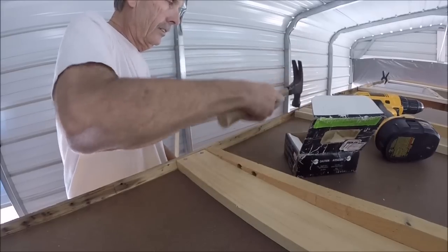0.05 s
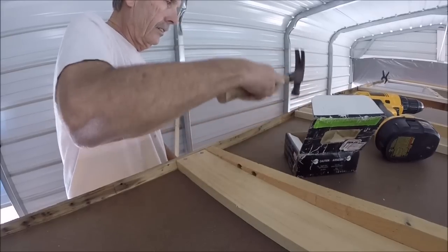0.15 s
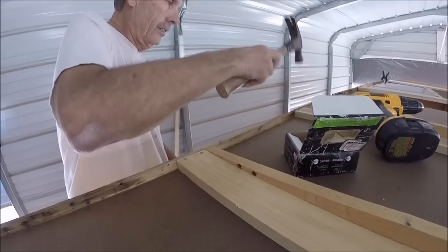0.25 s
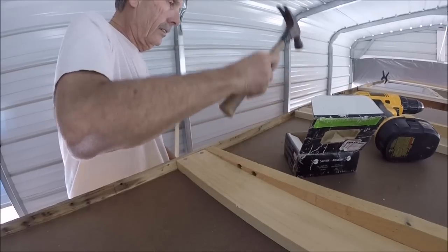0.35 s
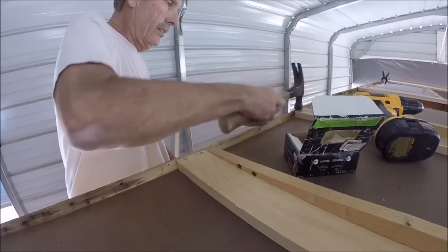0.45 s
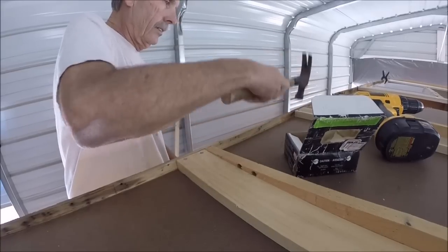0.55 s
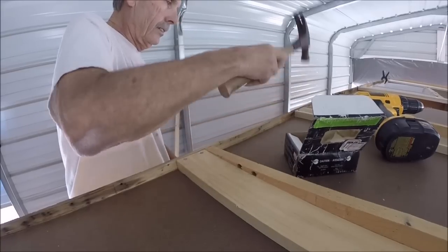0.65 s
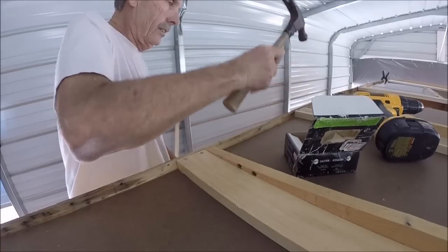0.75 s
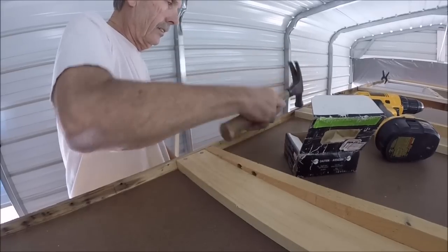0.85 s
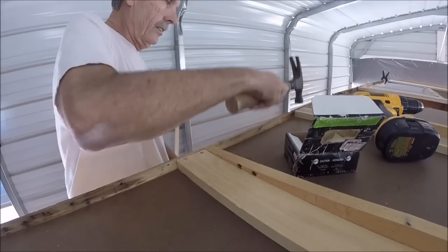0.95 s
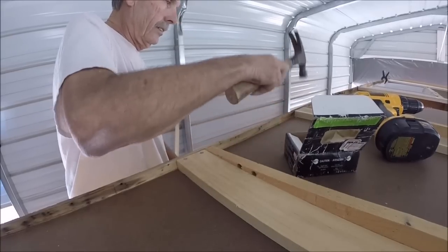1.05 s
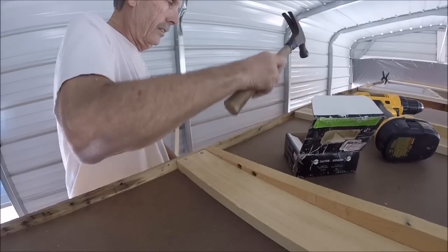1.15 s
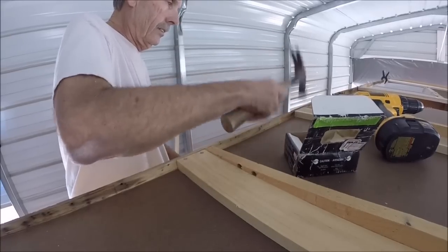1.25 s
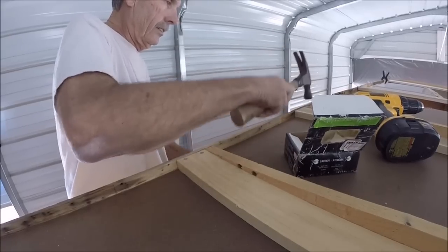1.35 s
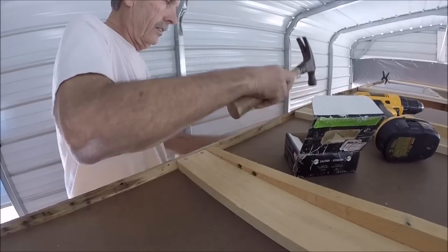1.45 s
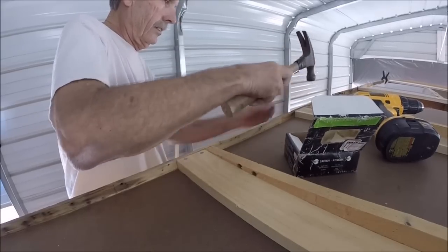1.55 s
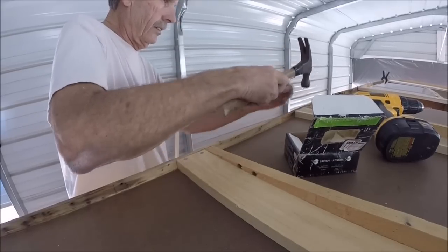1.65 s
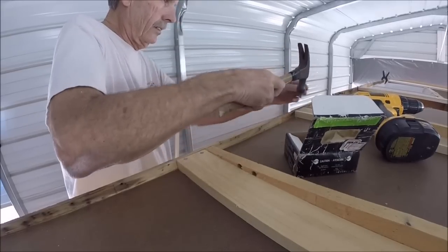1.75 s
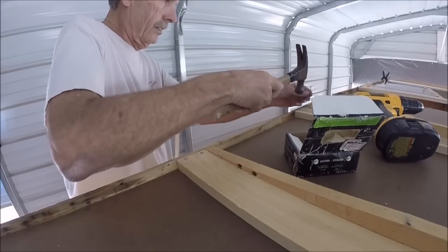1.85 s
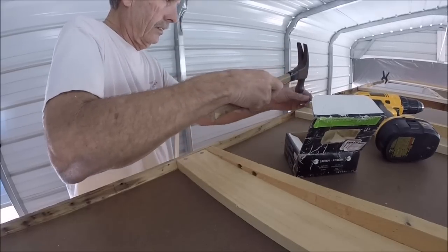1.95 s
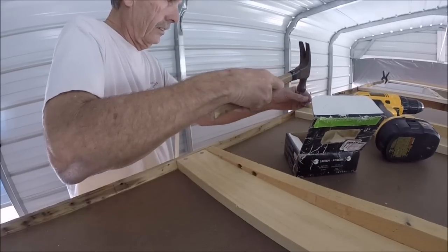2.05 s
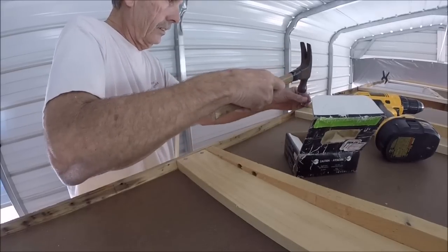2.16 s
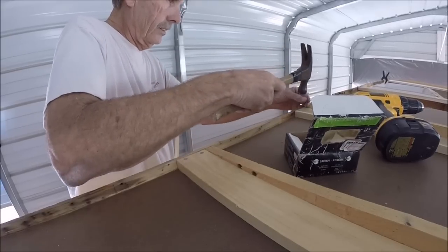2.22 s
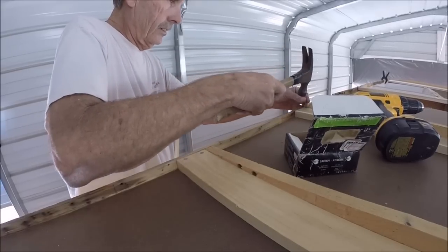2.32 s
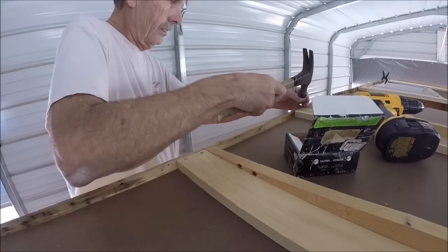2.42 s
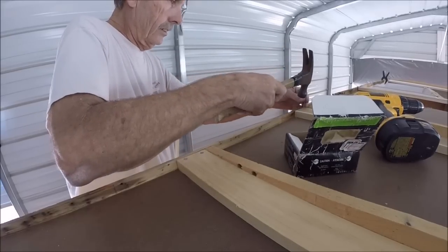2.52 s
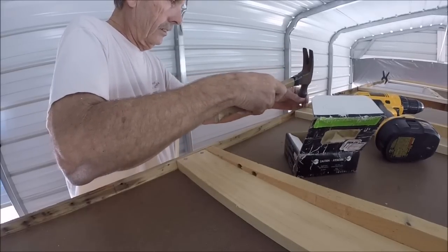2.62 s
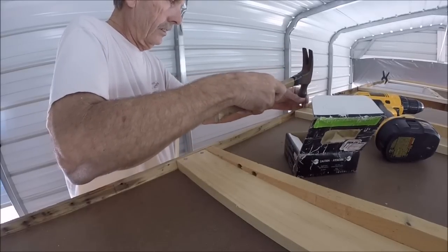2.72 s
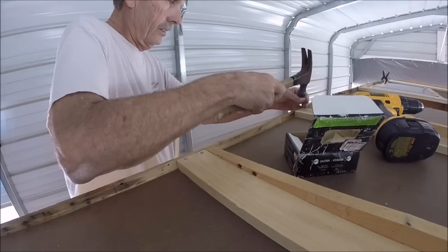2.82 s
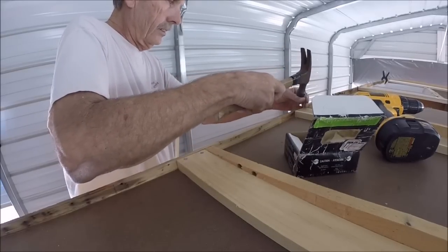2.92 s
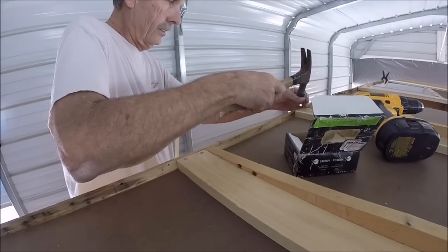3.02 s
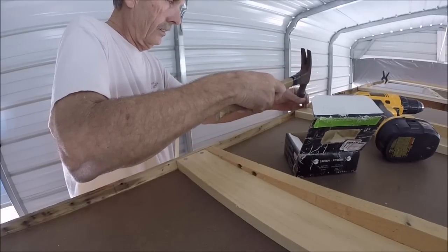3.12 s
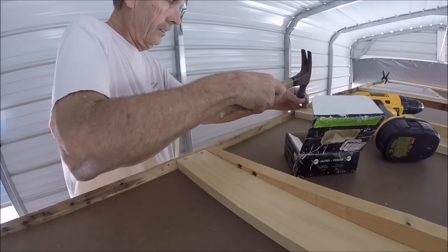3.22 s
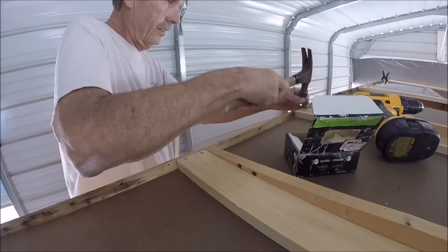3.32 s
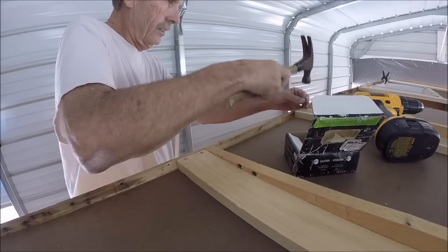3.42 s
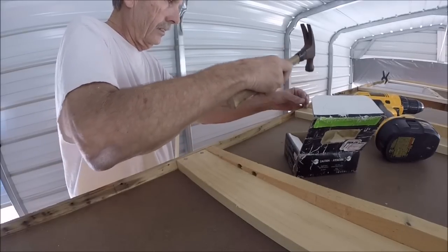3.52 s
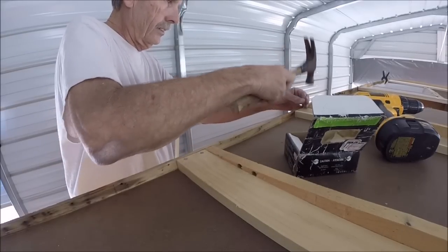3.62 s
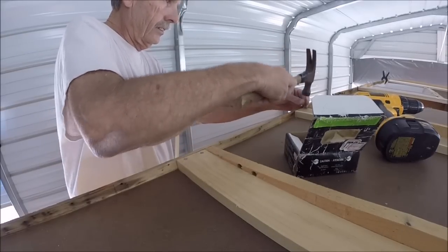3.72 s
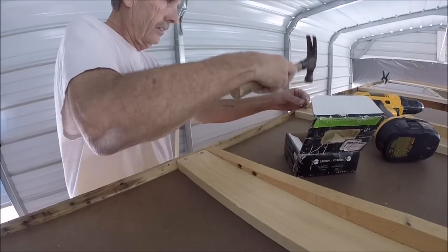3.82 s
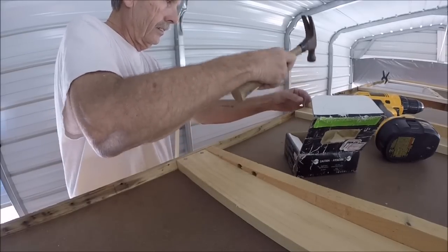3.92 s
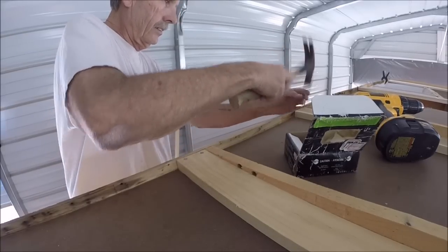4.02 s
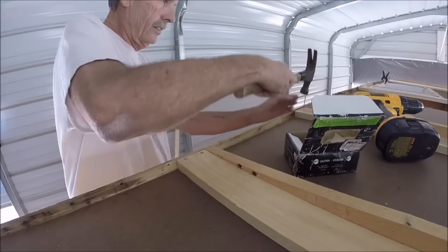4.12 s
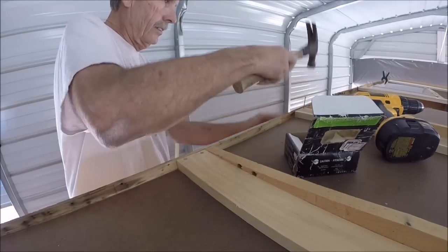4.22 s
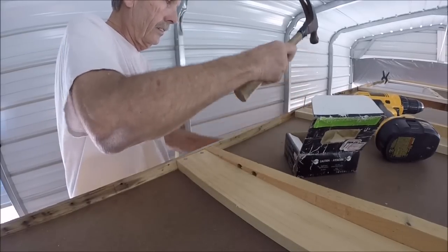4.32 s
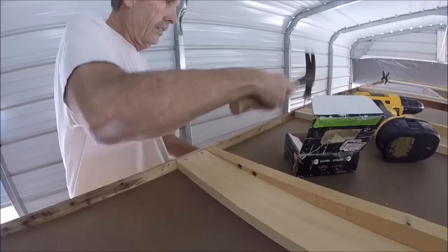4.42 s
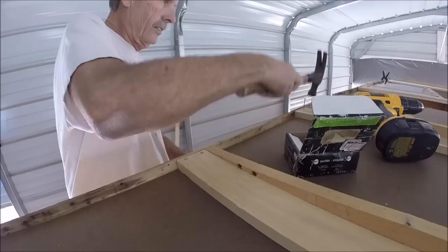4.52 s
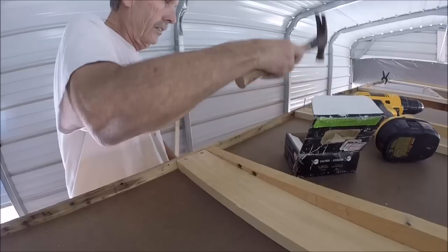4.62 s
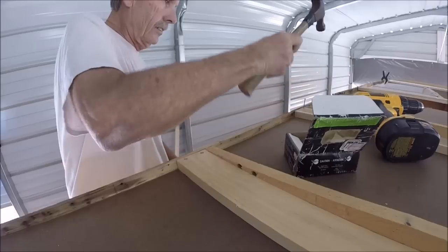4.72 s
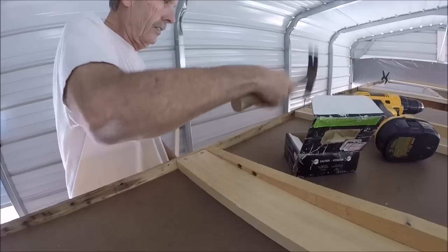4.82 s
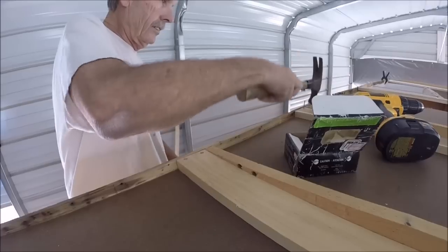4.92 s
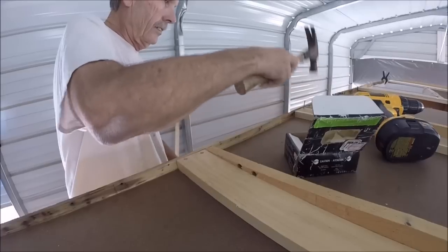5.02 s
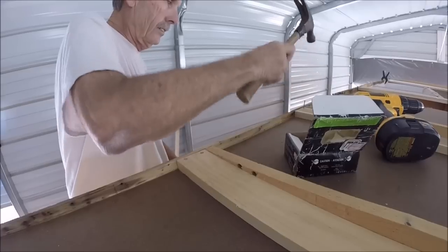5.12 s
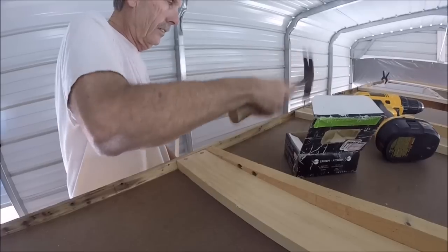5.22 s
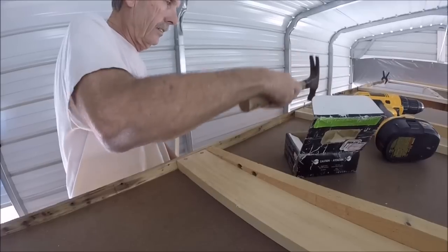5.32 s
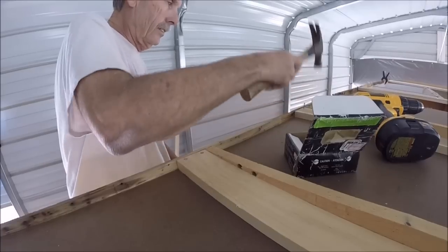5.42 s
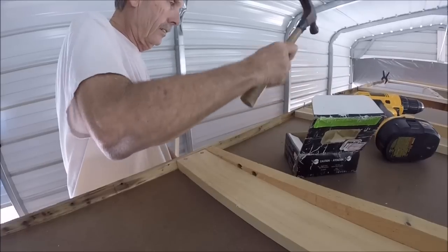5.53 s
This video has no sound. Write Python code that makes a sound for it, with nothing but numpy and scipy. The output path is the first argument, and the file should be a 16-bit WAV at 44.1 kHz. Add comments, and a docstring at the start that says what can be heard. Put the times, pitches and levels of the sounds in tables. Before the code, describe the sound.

Close by, under a sheet-metal carport, four hard hammer blows sink a nail into wood, the last two with a lower knock. After about two seconds of faint hiss comes a gentle tap with a hollow wooden bump. Four more evenly spaced strikes drive a second nail, its metallic ring rising in pitch, while the bench and wall panels resonate briefly.

```python
"""Under a sheet-metal carport, a claw hammer drives nails into a wooden strip on a bench.
Four blows sink one nail; after a pause a tap sets the next, whose ring climbs as it gets shorter.
Each blow is a steel crack, a nail ping and a wooden thud; bench and wall panels ring on, and twice
the loose frame hops and drops back. The camera's gain control ducks on the hard blows and lets the
background hiss swell in the pause."""
import sys
import numpy as np
from scipy import signal
from scipy.fft import rfft, irfft
from scipy.io import wavfile
from scipy.ndimage import uniform_filter1d, minimum_filter1d

SR = 44100
rng = np.random.default_rng(int(sys.argv[2]) if len(sys.argv) > 2 else 0)


def wav_out(sig):
    """Save sig, one row per channel (or a flat mono array), as 16-bit PCM at SR to the path in sys.argv[1]."""
    wavfile.write(sys.argv[1], SR, np.round(np.clip(np.atleast_2d(sig).T, -1, 1) * 32767).astype(np.int16))


N = 245616
AGE = np.arange(SR) / SR  # s since a blow
BINS = np.fft.rfftfreq(SR, 1 / SR)  # Hz
FLUSH_FROM_S, SECOND_NAIL_FROM_S = 1.2, 2.5

# the carport's reverb: (frequency [Hz], level [dB], t60 [s])
CARPORT_REVERB = [(50, 7.5, 0.7), (79, 4.5, 1), (115.6, 2, .5), (199, 6.5, .48), (275, 6, 0.45),
                  (612, 4.5, 0.39), (1500, -2.5, 0.39), (3530, 0.5, 0.36), (5930, -4.5, 0.35),
                  (8600, -0.5, 0.27), (15000, -5.5, 0.23)]


def amp(db):
    """Decibels to gain."""
    return 10 ** (np.asarray(db) / 20)


def curve(points, hz, column=1):
    """One column of a table, joined by straight lines over log frequency."""
    columns = np.transpose(points)
    return np.interp(np.log(hz + 1), np.log(columns[0] + 1), columns[column])


def add(mix, s, sound):
    """Lays a sound into the mix at s seconds."""
    part = mix[max(round(s * SR), 0):][:len(sound)]
    part += sound[:len(part)]


def pulse(db):
    """Spectrum of the tightest causal pulse with these levels."""
    log_gain = np.log(amp(np.r_[db, db[-2:0:-1]]))
    return np.exp(np.conj(signal.hilbert(log_gain)))[:len(db)]


def whitened(x, band_hz):
    """Spectrum of x with its power evened to 1 over bands of this width."""
    spectrum = rfft(x)
    power = uniform_filter1d(abs(spectrum) ** 2, band_hz)
    return spectrum * pulse(-10 * np.log10(power + 1e-12))


def ring(modes):
    """Dying sines from rows of (frequency [Hz], resonance peak [dB], t60 [s])."""
    out = np.zeros(SR)
    for hz, db, t60 in modes:
        damping, t = np.log(1000) / t60, AGE[AGE < 2 * t60]
        envelope = amp(db) * 2 * damping / SR * np.exp(-damping * t)
        add(out, 0, envelope * np.sin(2 * np.pi * hz * t))
    return out


def background_hiss(level_db=-47):
    """A steady bed of hiss with some low rumble."""
    # tone of the bed: (frequency [Hz], relative level [dB])
    colour = [(15, -53.5), (25, 1.5), (55, -0.5), (97, -3.5), (123, -2.5), (263, 0), (317, -5.5),
              (624, -10.5), (911, -7), (3340, -14), (4610, -24), (5730, -22), (7920, -40.5), (14400, -52),
              (16000, -66)]
    hz = np.fft.rfftfreq(N, 1 / SR)
    noise = irfft(rfft(rng.standard_normal(N)) * amp(curve(colour, hz)), N)
    return amp(level_db) * noise / noise.std()


def crack(tilt_db_per_octave, pivot_hz=1500):
    """Spectrum of the contact: a square blow on a free nail is brightest."""
    # steel meeting the nail head: (frequency [Hz], level [dB])
    colour = [(30, -20.5), (120, -1), (300, -5.5), (450, -6.5), (700, -1.5), (1150, 0.5), (1550, 4.5),
              (2250, -1.5), (3300, 3), (4500, -4), (6000, -4), (7300, -8), (9000, -19.5), (12000, -15.5),
              (16000, -43)]
    octaves_above = np.log2(np.maximum(BINS / pivot_hz, 1))
    return pulse(curve(colour, BINS) + tilt_db_per_octave * octaves_above)


def slips(t60=0.014):
    """Spectrum of the nail jerking through the fibres, which smears the crack over a few milliseconds."""
    return whitened(rng.standard_normal(SR) * amp(-60 * AGE / t60), band_hz=400)


def hammer_ring():
    """Spectrum of the steel hammer head's short, bright ring."""
    # modes of the head: (frequency [Hz], peak [dB], t60 [s])
    head_modes = [(5350, 2.5, 0.0052), (5410, 0.5, 0.01)]
    return rfft(ring(head_modes))


def nail_ping(hz, cycles, free_cycles=166, top_hz=12500):
    """Spectrum of the bending shank: wood that damps it also pulls its modes apart into a broad clang."""
    # close modes, faint overtones: (pitch [ratio], detune at free_cycles [share], peak [dB], t60 [ratio])
    shank_modes = [(1, -.07, -11, .3), (1, -.031, 4, 1), (1, -.003, 2, 1.1), (1, .032, 3, 1),
                   (1, .07, -7, .4), (2.09, 0, -21, .8), (3.1, 0, -24, .8), (3.9, 0, -18, .3)]
    t60 = cycles / hz
    spread = (free_cycles / cycles) ** 0.48
    modes = [(hz * ratio * (1 + detune * spread), db, t60 * life)
             for ratio, detune, db, life in shank_modes]
    # the modes start a quarter cycle apart; none above top_hz is rung
    return sum(rfft(ring([mode])) * 1j ** k for k, mode in enumerate(modes) if mode[0] < top_hz)


def thud(hz, t60=0.0082, db=6, low_cut_hz=200):
    """Spectrum of wood being shoved down and springing back."""
    push = rfft(ring([(hz, db, t60)]))
    low_cut = signal.butter(2, low_cut_hz, "high", fs=SR)
    return push * signal.freqz(*low_cut, worN=BINS, fs=SR)[1]


def strip_thud(s, nail_hz, loose_hz=330, pinned_hz=450):
    """The lower a nail knocks, the harder it shoves the strip; driven flush, it pins the thud higher."""
    flush = FLUSH_FROM_S < s < SECOND_NAIL_FROM_S
    handed_on_db = 5.5 - 9 * np.log2(nail_hz / 1000)
    return amp(handed_on_db) * thud(pinned_hz if flush else loose_hz)


def bench_ring(s, rise_s=0.012):
    """The large top takes a moment to start swinging; where it is struck decides which modes speak."""
    # strip and top: (frequency [Hz], peak at first nail [dB], peak at second nail [dB], uncapped t60 [s])
    wood_modes = [(51.15, 17, 19, 0.99), (79.1, 20, 22, 0.41), (165.7, 11, 14, 0.94),
                  (242.8, 22.5, 18, 0.24), (267.3, 14.5, 15.5, 0.45), (288.4, 22, 23, 0.32),
                  (310.6, -1.5, 21.5, 0.07), (331.7, 11.5, 14, 0.16), (352.5, 20.5, 18.5, .28),
                  (382, 11, 9.5, 0.74), (487.2, 13.5, 14.5, 0.18), (506, 8, 9, 0.39), (542, 18, 12, 0.22),
                  (603, 14, 3.5, 0.18), (666, 15, 16, 0.092), (713, 17.5, 2, 0.53), (763, 20, 11, 0.18),
                  (904, 12, 3, 0.48), (956, 13.5, -6, 0.11), (1029, 18.5, 8, 0.9), (1085, 5.5, 7.5, 0.75),
                  (1315, 8, -2.5, 0.77), (1328, 9.5, 5.5, 0.9), (1555, 3, -9, 0.31), (1628, 15, -21, 0.48),
                  (1570, 1, -2.5, 0.67)]
    hz, first_db, second_db, t60 = np.transpose(wood_modes)
    t60 = np.minimum(t60, 0.27 + 30 / hz)  # wood soaks up its higher modes quickly
    peak_db = second_db if s > SECOND_NAIL_FROM_S else first_db
    return ring(zip(hz, peak_db, t60)) * (1 - np.exp(-AGE / rise_s))


def tail(bands, rise_s):
    """Spectrum of dense reflections that build up, then die at their own speed in each band."""
    hz, t, noise = signal.stft(rng.standard_normal(SR), SR, nperseg=512)
    decay = amp(-60 * t / curve(bands, hz, column=2)[:, None])
    dying = signal.istft(noise * decay, SR, nperseg=512)[1][:SR]
    build_up = 1 - np.exp(-(AGE / rise_s) ** 2)
    return whitened(dying * build_up, band_hz=120) * amp(curve(bands, BINS))


def panel_drumming(contact):
    """Spectrum of the sheet-metal walls drumming on faintly after the crack."""
    # ring of the panels: (frequency [Hz], level [dB], t60 [s])
    panel_bands = [(45, -4, 1.1), (75, 11.5, 2.4), (115.7, -17.5, 4.2), (260, -16.5, 4.8), (800, -52, 1.2),
                   (3000, -53.5, .8)]
    return contact * tail(panel_bands, rise_s=0.04)


def hammering(nail_direct_db=-4, thud_to_room_db=-12, head_to_room_db=-7, full_swing_db=22):
    """Each blow sounds nail, hammer and wood; the carport throws it back."""
    # a free nail pings higher as it shortens; one that is nearly home only knocks, low and damped
    # (time [s], force [dB], brightness [dB/octave], bench ring [dB], hammer ring [dB],
    #  nail pitch [Hz], nail ring [dB], nail t60 [cycles])
    blows = [ (0.1208, 22, -0.3, 2.5, -3.5, 1033, 4, 18), (0.5410, 24.5, -2.5, -2, -8.5, 1455, -6.5, 46),
             (0.9587, 24, -4, -3, -3, 690, 8, 21), (1.3916, 24, -3, -7.5, -11, 714, 4, 25),
             (3.7716, -1.5, 0.1, 17, 9, 565, 6, 20), (4.1547, 16.5, -0.5, 4, -4, 2820, 5, 104),
             (4.5406, 22, -1.5, -1, -2.5, 3704, 14.5, 190), (4.9456, 23, -0.9, -6.5, -1.5, 4630, 10, 42),
             (5.3452, 23.5, 0, -3.5, -1.5, 6450, 1, 86)]
    # early reflections off bench and worker: (delay [s], level [dB])
    reflections = [(.0024, -35), (.0074, -9.5)]
    echoes = sum(amp(db) * np.exp(-2j * np.pi * BINS * s) for s, db in reflections)
    fade = np.minimum(2 - 2 * AGE, 1) ** 2
    mix = np.zeros(N)
    for s, force_db, tilt, bench_db, head_db, nail_hz, nail_db, cycles in blows:
        contact = crack(tilt)
        head = amp(head_db) * hammer_ring()
        nail = amp(nail_db) * nail_ping(nail_hz, cycles)
        strip = strip_thud(s, nail_hz)
        direct = (contact * slips() + head + amp(nail_direct_db) * nail) * (1 + echoes) + strip
        # the camera sits on the bench, so it hears the thud mostly direct
        sends = [contact, nail, amp(head_to_room_db) * head + amp(thud_to_room_db) * strip]
        wet_db = 2.4 + 0.19 * (full_swing_db - force_db)  # a harder swing sounds drier
        room = amp(wet_db) * sum(send * tail(CARPORT_REVERB, rise_s=0.0011) for send in sends)
        blow = irfft(direct + room + panel_drumming(contact)) + amp(bench_db) * bench_ring(s)
        add(mix, s, amp(force_db) * fade * blow)
    return mix


def frame_drops(thud_hz=285, room_db=-6):
    """The loose frame hops under a blow and lands on the bench: a dull, hollow knock of wood on wood."""
    # landings: (time [s], force [dB], thud [dB], bench ring [dB])
    landings = [(1.008, 13, 13, -14), (3.8205, -4.5, 16.5, 8)]
    mix = np.zeros(N)
    for s, force_db, thud_db, bench_db in landings:
        knock = crack(tilt_db_per_octave=-2) * slips() + amp(thud_db) * thud(thud_hz, t60=0.02)
        room = amp(room_db) * tail(CARPORT_REVERB, rise_s=0.0046)
        airborne = irfft(knock * (1 + room))
        add(mix, s, amp(force_db) * (airborne + amp(bench_db) * bench_ring(s)))
    return mix


def scene():
    """Hammer blows and frame knocks over the hiss, in mono."""
    return (hammering() + background_hiss() + frame_drops())[None]


def ducking(x, threshold_db=-19, slope=0.79, hold_s=0.44, release_db_per_s=21, low_cut_hz=600):
    """Gain reduction in dB: clamps at once on a sharp, loud sound, holds, then lets go steadily."""
    sidechain = signal.lfilter(*signal.butter(2, low_cut_hz, "high", fs=SR), x)
    power_db = 10 * np.log10(abs(uniform_filter1d(sidechain ** 2, size=180)) + 1e-12)
    cut_db = slope * np.maximum(power_db - threshold_db, 0)
    cut_db[0] = 12.5  # starts ducked: the work is already under way
    half_hold = int(hold_s * SR / 2)
    held_db = -minimum_filter1d(-cut_db, 2 * half_hold + 1, origin=half_hold, mode="nearest")
    climb_db = release_db_per_s * np.arange(N) / SR
    released_db = np.maximum.accumulate(held_db + climb_db) - climb_db
    return uniform_filter1d(released_db, size=40)


def record(dry, ceiling=0.5, high_cut_hz=15200):
    """The camera's gain control, soft overload on the peaks, then a steep high cut."""
    ducked = dry / amp(ducking(dry[0]))
    limited = ducked / (1 + (ducked / ceiling) ** 6) ** (1 / 6)
    high_cut = signal.firwin(255, high_cut_hz, window=("kaiser", 9), fs=SR)
    return signal.oaconvolve(limited, high_cut[None], "same")


dry = scene()
out = record(dry)
wav_out(out)
```